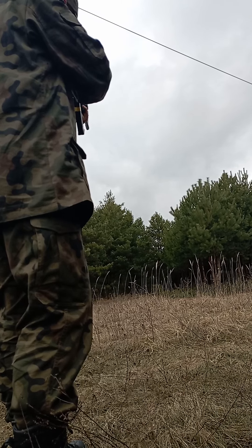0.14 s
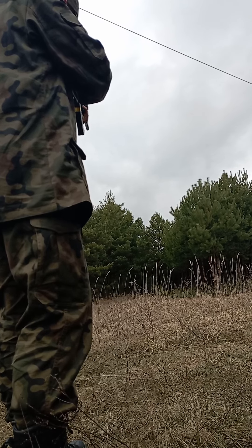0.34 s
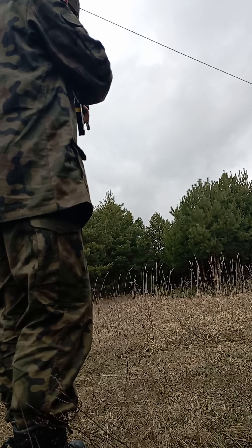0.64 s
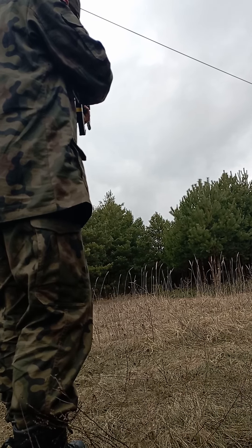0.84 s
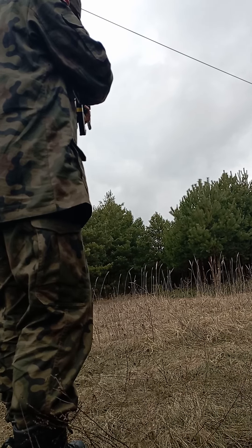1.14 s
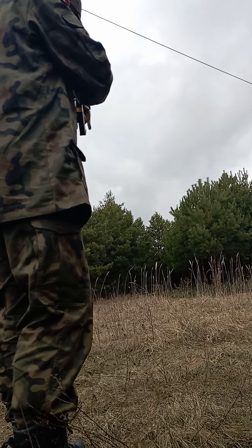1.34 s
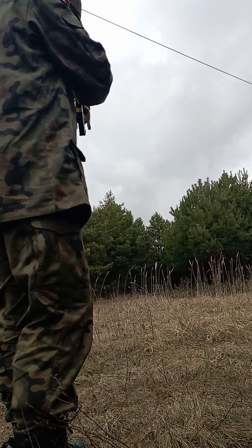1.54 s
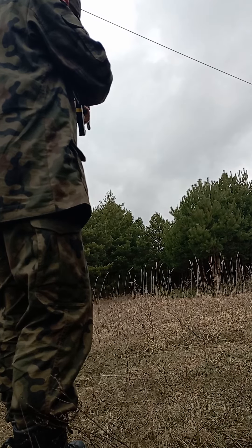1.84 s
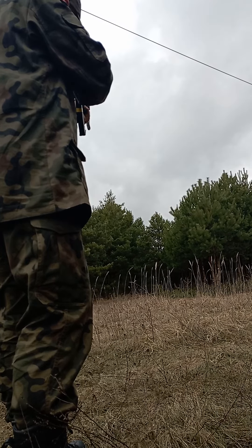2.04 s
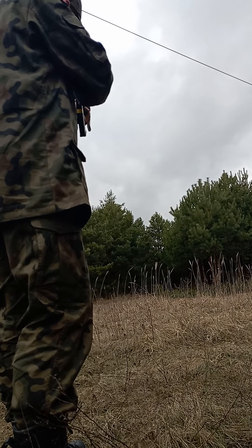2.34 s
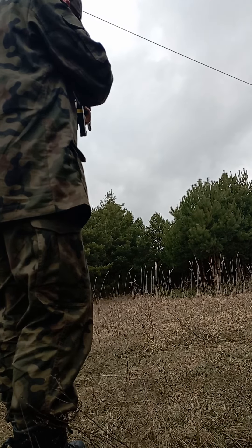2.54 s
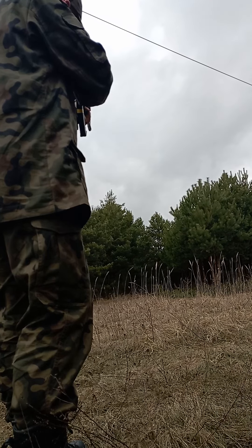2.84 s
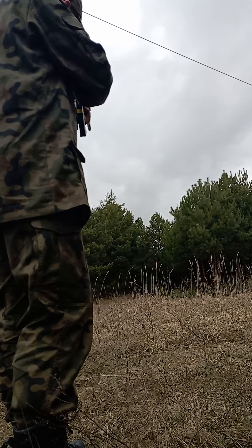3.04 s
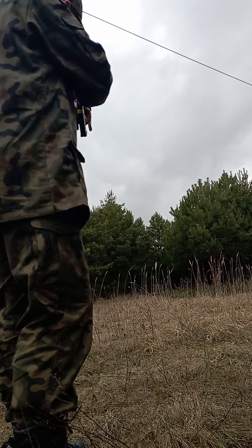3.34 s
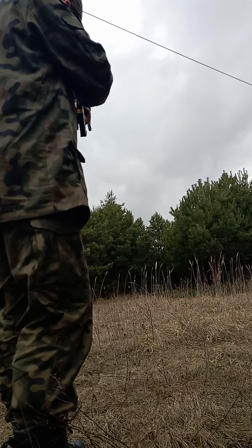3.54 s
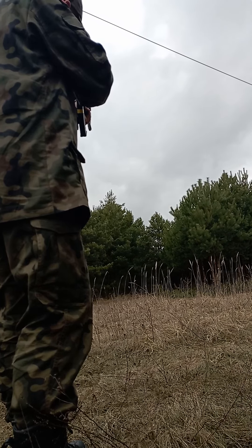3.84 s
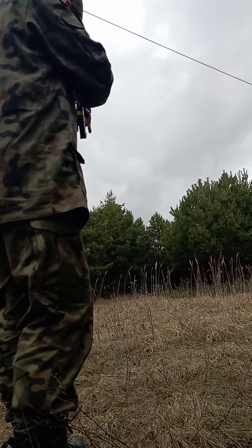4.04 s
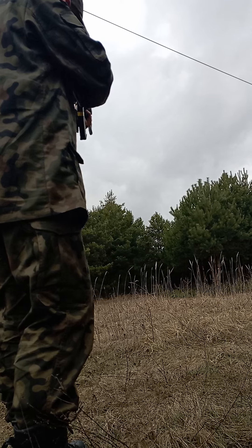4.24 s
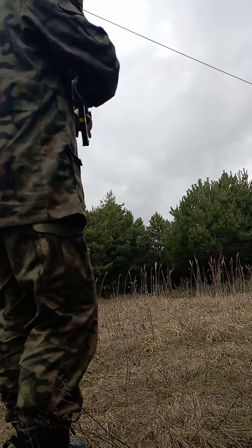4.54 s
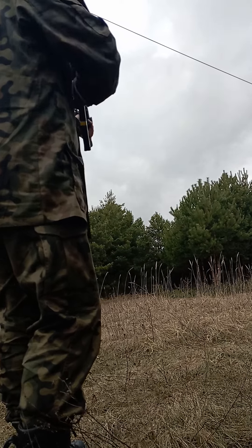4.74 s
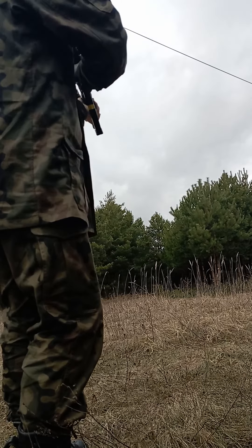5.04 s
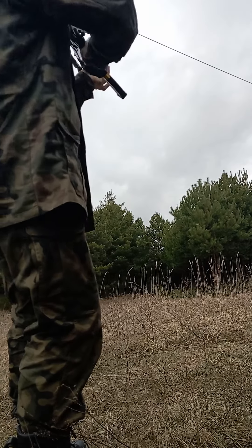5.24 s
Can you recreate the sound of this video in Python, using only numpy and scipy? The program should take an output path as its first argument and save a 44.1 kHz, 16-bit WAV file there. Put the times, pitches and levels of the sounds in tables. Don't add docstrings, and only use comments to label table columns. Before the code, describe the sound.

Close in an open field, an electric airsoft rifle rattles off a four-second full-auto burst, stops dead, then faint cloth rustle and tiny clicks.

```python
import sys
import numpy as np
from scipy import signal
from scipy.fft import rfft, irfft, next_fast_len
from scipy.io import wavfile

SR = 44100
rng = np.random.default_rng(int(sys.argv[2]) if len(sys.argv) > 2 else 0)


def log_audio(samples):
    frames = np.atleast_2d(samples).T
    limited = np.clip(frames, -1, 1)
    pcm = np.round(limited * 32767).astype(np.int16)
    wavfile.write(sys.argv[1], SR, pcm)


def gain_from_decibels(decibels):
    exponent = np.asarray(decibels, float) / 20
    return 10 ** exponent


N = 238111

# [t/s, level/dB]
MOTOR = [
    (0, -0.5),
    (.03, -0.5),
    (3.955, 0.5),
    (4.0, -7.5),
    (4.05, -2),
    (4.1, -14.5),
    (4.17, -40),
]
# [f/Hz, left minus right level/dB]
FIELD_PAN = [(60, -1.5), (110, 1), (200, -3), (380, -4), (700, 1), (1290, 3.5), (2380, -3), (4400, -6.5),
             (8120, -2), (15000, 7)]
# [f/Hz, likeness (1 = same)]
FIELD_ALIKE = [(60, 0.93), (180, 0.81), (550, 0.8), (1650, 0.21), (4970, -1.1), (15000, 1)]
PORT_LAG = 8
LOUD_PING = 33


def slams():
    # [shot number, t/ms since the shot before]
    pace = [
        (1, 107.72),
        (2, 99.43),
        (5, 98.22),
        (19, 101.28),
        (27, 100.86),
        (28, 101.78),
        (37, 101.57),
        (38, 102.11),
        (39, 103.9),
    ]
    first_slam_s, usual_db, spread_db = .0179, -4, 1.0
    gaps_ms = read(pace, np.arange(1, pace[-1][0] + 1))[0]
    at = first_slam_s + np.r_[0, np.cumsum(gaps_ms)] / 1000
    peak_db = usual_db + spread_db * rng.standard_normal(len(at))
    peak_db[0] = usual_db + 1.5
    peak_db[LOUD_PING] = usual_db
    return np.round(at * SR) / SR, peak_db


def rifle():
    at, peak_db = slams()
    knocks, shaken = gearbox(at)
    return crack(at, peak_db) + knocks + recoil(at) + winding(at, shaken)


def air_jet(at):
    t = np.arange(N) / SR
    halfway = (at[1:] + at[:-1]) / 2
    ms = (t - at[np.searchsorted(halfway, t)]) * 1000
    full_ms, shut_ms, whistle_on_ms = -1.9, -0.65, -3
    before_shut = ms < shut_ms

    hiss_db = -28.5 + 8.5 * np.minimum(ms - full_ms, 0)
    leak_db = -36.5 - 1.1 * ms
    hiss_db = np.where(before_shut, hiss_db, leak_db)
    rise_db = 16 * np.minimum(ms - whistle_on_ms, 0)
    fade_db = 3.5 * np.clip(ms - whistle_on_ms, 0, 10)
    swell_db = rise_db - fade_db
    whistle_db = -29.5 + swell_db

    hiss, breath = gain_from_decibels([hiss_db, whistle_db]) * rng.standard_normal((2, N)) * [ms < 50, before_shut] + 1e-18
    hiss = signal.sosfilt(signal.butter(2, 5500, "high", fs=SR, output="sos"), hiss)
    breathy = ring(breath, 7280, 0.0061) + gain_from_decibels(-7.0) * ring(breath, 6820, 0.018)
    pure = gain_from_decibels(-21 + swell_db) * before_shut * np.sin(2 * np.pi * 7040 * t)
    return hiss, gain_from_decibels(-2) * breathy + pure


def crack(at, peak_db):
    # [left t/ms after slam, left strength, right t/ms after slam, right strength]
    arrivals = [
        (-.79, -.1, -.68, .05),
        (-.51, -.19, -.45, -.29),
        (-.14, 1, -.07, 1),
        (.3, 0, .02, .34),
        (.72, .16, .72, .12),
        (1.67, -.47, 1.52, -.4),
        (2.09, -.15, 2.14, -.15),
        (2.77, -.1, 2.9, -.05),
        (4.0, .06, 4.2, .08),
    ]
    # [f/Hz, level/dB, polarity, time to fade by 60 dB/s]
    left_port = [(1516, -36, 1, .016), (3900, -27, 1, .003), (6500, -16, 1, .0024), (9336, 1.5, -1, .001),
                 (10820, -8.5, 1, .0015), (12500, -10.5, 1, .0009), (15300, -17, -1, .001)]
    right_port = [(2170, -30, 1, .016), (4490, -25, 1, .0015), (6790, -21, -1, .0094), (7005, -4, 1, .0027),
                  (9120, -5.5, -1, .0009), (12400, -12, 1, .0009), (15300, -18, -1, .001)]
    main_crack = 2
    hiss, whistle = air_jet(at)
    out = gain_from_decibels([[-8], [-3]]) * whistle

    ping_db = -43.5 + 6 * rng.standard_normal(len(at))
    ping_db[LOUD_PING] = -15.5
    out += gain_from_decibels([[-2], [0]]) * ring(strike(at, gain_from_decibels(ping_db)), 5650, 0.006)

    wobble = rng.standard_normal((len(at), len(arrivals)))
    for side, port in enumerate((left_port, right_port)):
        clicks = np.roll(hiss, 4 * side)
        for k, row in enumerate(arrivals):
            delay_ms, strength = row[2 * side], row[2 * side + 1]
            level_db = peak_db + 3.6 + 1.8 * wobble[:, k] * (k != main_crack)
            delay_s = np.round(delay_ms * SR / 1000) / SR
            clicks = clicks + strike(at + delay_s, strength * gain_from_decibels(level_db))
        for hz, db, way, t60 in port:
            out[side] += way * gain_from_decibels(db) * ring(clicks, hz, t60)
    return out


def gearbox(at):
    # [t/ms after slam, strength]
    stroke = [
        (-13.1, -.34),
        (-9.5, .26),
        (-6.3, -.2),
        (-3.2, .22),
        (1.31, -.89),
        (2.82, 1),
    ]
    # [t/ms after slam, blow level/dB, scatter/dB, rattle level/dB]
    contacts = [
        (11.58, -23.5, 1.5, -57.5),
        (20.55, -31.5, 3, -51.5),
        (24.96, -19.5, 3.0, -38.5),
        (32.7, -31, 6, -36.5),
        (40.23, -19, 2.5, -32.5),
        (56.7, -24.5, 5, -39.5),
        (70.7, -28, 4.0, -48.5),
        (84.5, -21, -2, -60),
    ]
    # [f/Hz, left level/dB, right level/dB, polarity, time to fade by 60 dB/s]
    body = [(325, -39.5, -37.5, 1, .03), (419, -30.5, -29.5, -1, .015), (539, -24, -21.5, -1, .0235),
            (644, -30, -28, 1, .045), (708, -40, -38, 1, .05), (936, -38, -38, 1, .03)]
    firm = rng.standard_normal((len(at), len(stroke), 2))
    blows = np.zeros(N)
    for c, (ms, strength) in enumerate(stroke):
        when = at + (ms + .04 * firm[:, c, 0]) / 1000
        blows += strike(when, strength * gain_from_decibels(.5 + .7 * firm[:, c, 1]))

    luck = rng.standard_normal((len(at), len(contacts), len(body) + 2))
    loose, shaken = np.zeros((len(body), N)), np.zeros(N)
    for c, (ms, blow_db, scatter, rattle_db) in enumerate(contacts):
        when = at + (ms + .3 * scatter * luck[:, c, -1]) / 1000
        power_db = read(MOTOR, when)[0]
        for k in range(len(body)):
            loose[k] += strike(when, gain_from_decibels(blow_db + power_db + scatter * luck[:, c, k]))
        shaken += strike(when, gain_from_decibels(rattle_db - 1.0 + 0.28 * scatter * luck[:, c, -2]))

    out = np.zeros((2, N))
    for k, (hz, left_db, right_db, way, t60) in enumerate(body):
        out += way * ring(blows + loose[k], hz, t60) * gain_from_decibels([[left_db], [right_db]])
    out[1] = np.roll(out[1], PORT_LAG)
    out = signal.sosfilt(signal.butter(3, 240, "high", fs=SR, output="sos"), out)
    rattle_fade_s = 0.0032
    return out, signal.lfilter([1], [1, -np.exp(-1 / (rattle_fade_s * SR))], shaken)


def recoil(at):
    ms = np.arange(-.03 * SR, .03 * SR) / SR * 1000
    swing = np.cos(2 * np.pi * 99 * (ms + .5) / 1000) * np.exp(-.5 * ((ms - .5) / 6.5) ** 2)
    pushes = strike(at, gain_from_decibels(-38 + 0.84 * rng.standard_normal(len(at))))
    return signal.fftconvolve(pushes, swing, "same") * gain_from_decibels([[0], [3]])


def winding(at, shaken):
    # [f/Hz, level/dB per Hz]
    rattle_colour = [(180, -41), (300, -14.5), (496, -1.5), (694, -9.5), (1000, -5.5), (1270, -16.5),
                     (1930, -7), (2610, -13.5), (3190, -6), (4540, -10.5), (4930, -10), (10500, -8.5),
                     (15200, -28), (16500, -65.5)]
    # [f/Hz, level/dB per Hz]
    gear_colour = [(35, -39.5), (60, -5), (161, -6), (366, -15), (534, -3), (708, -20.5), (916, -11),
                   (1240, -12.5), (1810, -5.5), (2240, -11.5), (4320, -8.5), (5340, -12), (10100, -13.5),
                   (14700, -24), (16500, -63)]
    # [f/Hz, left minus right level/dB]
    rifle_pan = [(60, 0.5), (110, -4), (200, 0), (380, 1), (700, -5), (1290, 4), (2380, -3), (4400, -5),
                 (8120, 1.5), (15000, 4)]
    # [f/Hz, likeness (1 = same)]
    rifle_alike = [(60, 0.98), (500, 1), (1500, 0.52), (3000, 0.52), (6000, 0.13), (15000, 0.12)]
    catch_ms, let_go_ms, ease_ms = 8, 86, 6
    t = np.arange(N) / SR
    marks = np.r_[at[0] - .105, at]
    since = (t - marks[np.searchsorted(marks, t) - 1]) * 1000
    turning = t < at[-1]
    load = np.clip(since / let_go_ms, 0, 1) ** 2.2 * turning
    free = np.maximum(1 - since / catch_ms, (since - let_go_ms) / ease_ms)
    free = np.clip(free, 0, 1) * turning

    rattle_db = np.maximum(-36 - 0.31 * since, -50.5)
    hiss_db = -46.5 + 6.5 * load - 8 * free
    whine_db = -60 + 13.5 * np.sqrt(load) - 13 * free
    whine_hz = 2084 - 431 * load
    rattle = (gain_from_decibels(rattle_db) + shaken) * noise(rattle_colour, rifle_pan, rifle_alike, grain_db=-1.5)
    hiss = gain_from_decibels(hiss_db) * noise(gear_colour, rifle_pan, rifle_alike)
    teeth = gain_from_decibels([[-1], [-7]]) * whine(.92 * whine_hz, width=35)
    teeth = teeth + gain_from_decibels([[-8], [0]]) * whine(whine_hz, width=54)
    mesh = gain_from_decibels(whine_db) * teeth
    mesh += gain_from_decibels([[-60], [-55]]) * whine(4560 + 0.3 * (whine_hz - 1800), width=110)
    mesh += gain_from_decibels([[-56], [-53]]) * whine(np.full(N, 570.), width=17)
    out = gain_from_decibels(read(MOTOR, t)[0]) * (rattle + hiss + mesh)
    out[1] = np.roll(out[1], PORT_LAG)
    return out


def whine(hz, width):
    return (0.87 + drift(width)) * np.sin(2 * np.pi * np.cumsum(hz) / SR)


def shooter():
    # [f/Hz, level/dB per Hz]
    cloth_colour = [(300, -20), (480, 11), (1000, 2), (1500, 0), (1640, -6), (2430, -10), (2770, -1.5),
                    (7770, -3.5), (9890, -6), (14200, -20), (16500, -34)]
    # [f/Hz, level/dB per Hz]
    strap_colour = [(880, -43), (1500, -10.5), (2330, -11.5), (3450, 3), (4700, 3), (5800, -0.5), (7250, 1),
                    (10900, -5), (15200, -16), (16500, -22)]
    # [t/s, length/s, level/dB]
    rustles = [
        (4.15, 0.049, -69),
        (4.34, .2, -74),
        (4.557, .07, -61.5),
        (4.76, .008, -65.5),
    ]
    # [t/s, peak level/dB]
    steps = [
        (4.969, -43),
        (5.043, -44.5),
    ]
    # [t/s, peak level/dB]
    buckle = [(4.3296, -63), (4.3434, -63), (4.3552, -55), (4.3654, -59), (4.3804, -59), (4.3994, -66),
              (4.4418, -58), (4.579, -54), (4.6488, -58), (4.8994, -65.5), (5.2693, -50), (5.3167, -41),
              (5.3507, -51)]
    # [t/s, peak level/dB]
    swivel = [(4.2404, -61), (4.297, -59), (4.4774, -64), (4.4997, -61), (4.7034, -61), (4.7114, -60),
              (4.7454, -66), (4.7671, -63), (4.9994, -65.5), (5.0287, -62), (5.0954, -63)]
    t = np.arange(N) / SR
    sleeve = noise(cloth_colour, FIELD_PAN, FIELD_ALIKE, grain_db=1.5)
    strap = noise(strap_colour, FIELD_PAN, FIELD_ALIKE, grain_db=1.5)
    moves = np.zeros(N)
    for start, length, db in rustles:
        outside_s = np.maximum(np.maximum(start - t, t - start - length), 0)
        moves += gain_from_decibels(db - 700 * outside_s)

    strap_s = 5.123
    swell = np.where(t < strap_s, 220, 53)
    slide_db = -71.5 + (t - strap_s) * swell
    out = moves * sleeve + (gain_from_decibels(slide_db) + gain_from_decibels(-80)) * strap
    out += ticks(buckle, 9050) + ticks(swivel, 3500)
    for s, db in steps:
        thud = strike([s - .01], gain_from_decibels(db - 41.0))
        out += ring(ring(thud, 87, 0.072), 107, 0.04)
    return out


def ticks(rows, hz):
    out = np.zeros(N)
    for (s, db), chance in zip(rows, rng.standard_normal(len(rows))):
        click = strike([s], gain_from_decibels(db))
        out += gain_from_decibels(-2.0) * ring(click, hz * np.exp(.07 * chance), 0.0053)
        out += gain_from_decibels(4.0) * ring(click, 9400, 0.0012)
        out -= gain_from_decibels(-10) * ring(click, 5000, 0.0012)
    out = signal.sosfilt(signal.butter(2, 11500, fs=SR, output="sos"), out)
    return out * gain_from_decibels([[.75], [-.75]])


def open_field():
    # [f/Hz, level/dB per Hz]
    field_colour = [(18, -43), (30, -14.5), (101, 2.5), (212, -3), (283, -4), (519, -11.5), (593, -10.5),
                    (1310, -21.5), (1800, -24), (4900, -33), (6050, -35.5), (9730, -36.5), (15200, -52),
                    (16500, -63)]
    return gain_from_decibels(-58 + 1.0 * drift(3.3)) * noise(field_colour, FIELD_PAN, FIELD_ALIKE)


def noise(spectrum, pan, alike, grain_db=0.0):
    size = next_fast_len(N)
    log_hz = np.log(np.maximum(np.arange(size // 2 + 1) * SR / size, 1))

    def on_log(points):
        return read([(np.log(hz), value) for hz, value in points], log_hz)[0]

    grit = gain_from_decibels(grain_db * drift(400.))
    mid, side = rfft(rng.standard_normal((2, N)) * grit, size)
    like = np.clip(on_log(alike), -1, 1)
    pair = np.sqrt(1 + like) * mid + np.sqrt(1 - like) * side * [[1], [-1]]
    colour = gain_from_decibels(on_log(spectrum) + on_log(pan) * [[.5], [-.5]])
    return rms_one(irfft(pair * colour, size)[:, :N])


def strike(seconds, sizes):
    clicks = np.full(N, 1e-18)
    at = np.round(np.asarray(seconds) * SR).astype(int)
    inside = (at >= 0) & (at < N)
    np.add.at(clicks, at[inside], (sizes * np.ones(len(at)))[inside])
    return clicks


def ring(clicks, hz, t60):
    r, w = gain_from_decibels(-60 / (t60 * SR)), 2 * np.pi * hz / SR
    return signal.lfilter([0, np.sin(w)], [1, -2 * r * np.cos(w), r * r], clicks)


def drift(rate):
    r = np.exp(-2 * np.pi * rate / SR)
    wander = signal.lfilter([1], [1, -2 * r, r * r], rng.standard_normal(N + SR))
    return rms_one(wander[SR:])


def rms_one(x):
    return x / np.sqrt(np.mean(x ** 2) + 1e-20)


def read(rows, at):
    where, *columns = np.transpose(rows)
    return [np.interp(at, where, c) for c in columns]


def scene():
    return rifle() + shooter() + open_field()


def roll_off(x):
    return signal.sosfilt(signal.butter(12, 17150, fs=SR, output="sos"), x)


def record(dry):
    thin = signal.sosfilt(signal.butter(3, 40, "high", fs=SR, output="sos"), dry)
    mix = signal.sosfilt(signal.cheby2(10, 60, 17300, fs=SR, output="sos"), thin)
    return roll_off(mix)


dry = scene()
out = record(dry)
log_audio(out)
```